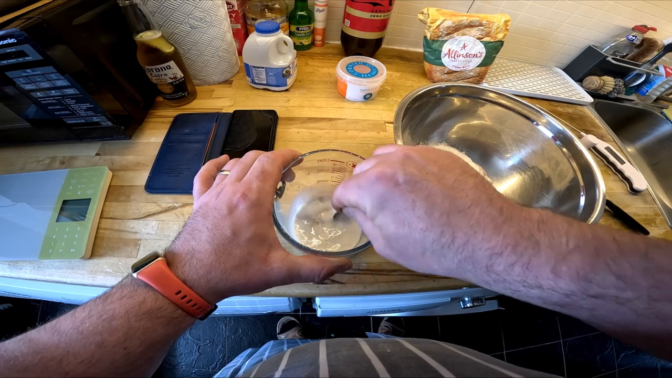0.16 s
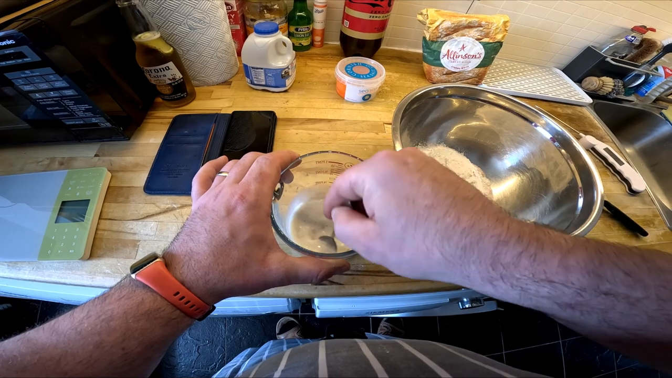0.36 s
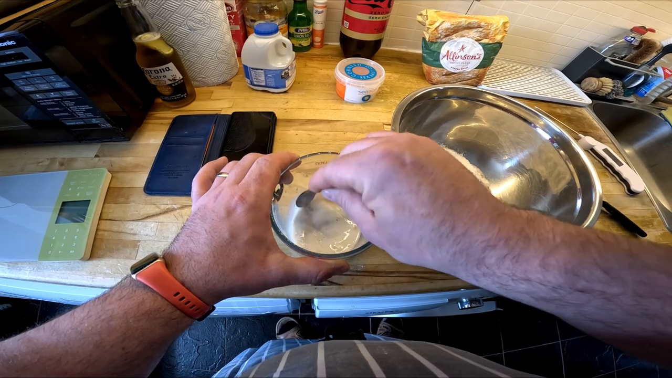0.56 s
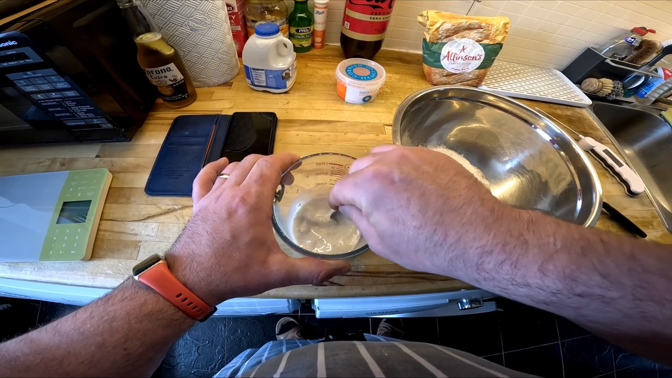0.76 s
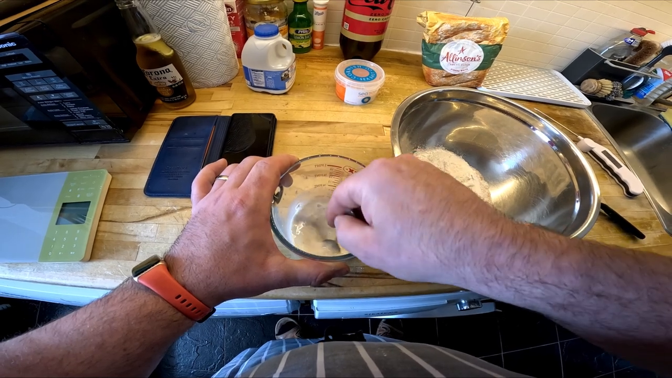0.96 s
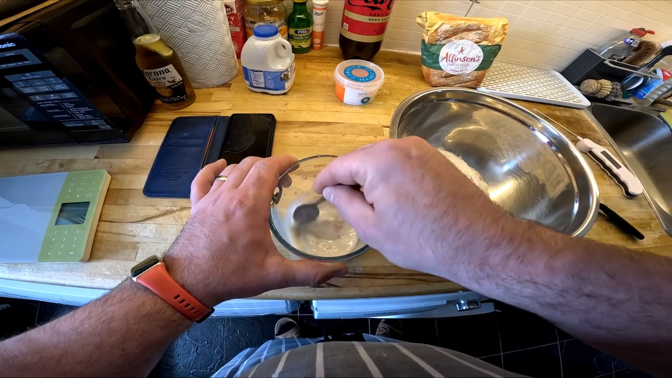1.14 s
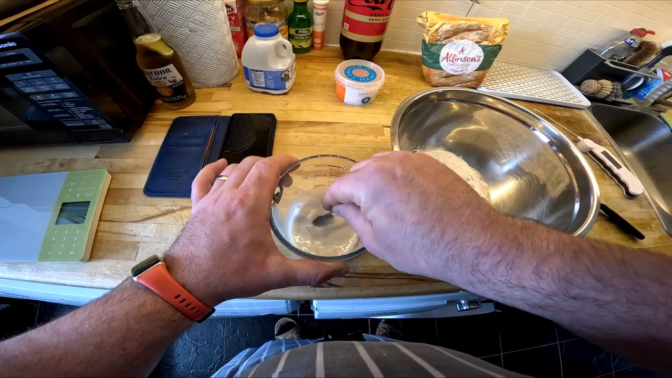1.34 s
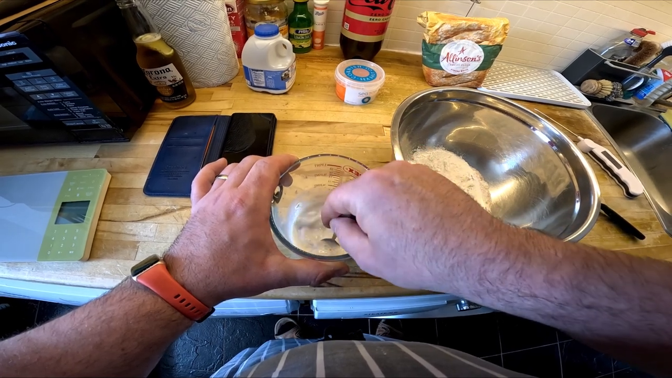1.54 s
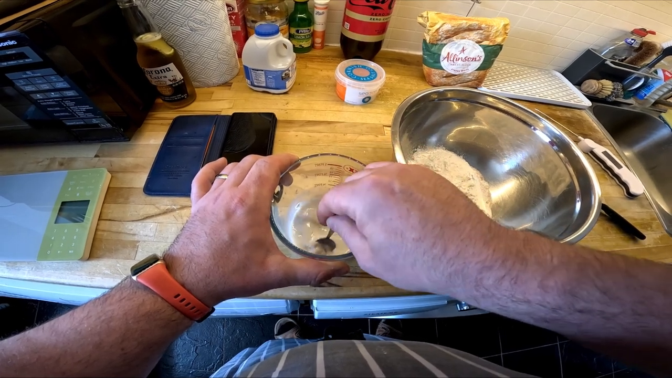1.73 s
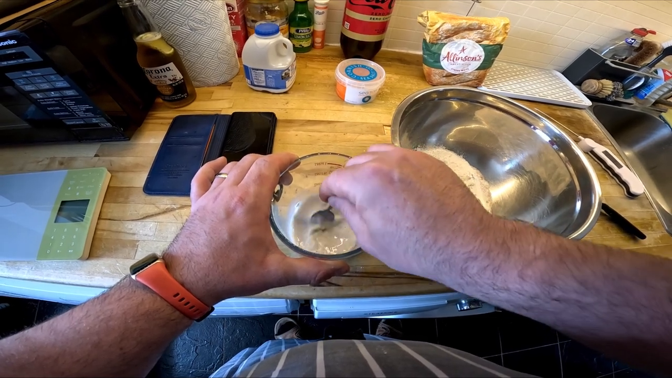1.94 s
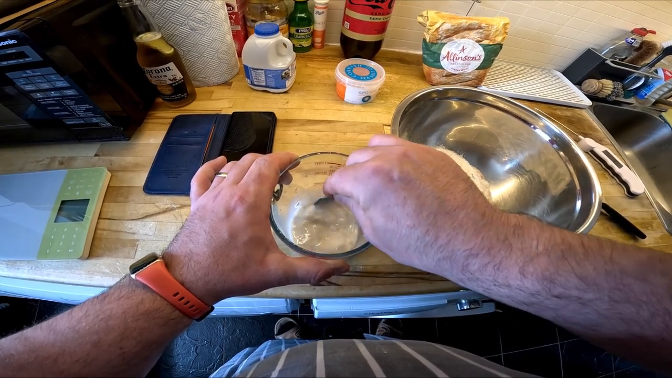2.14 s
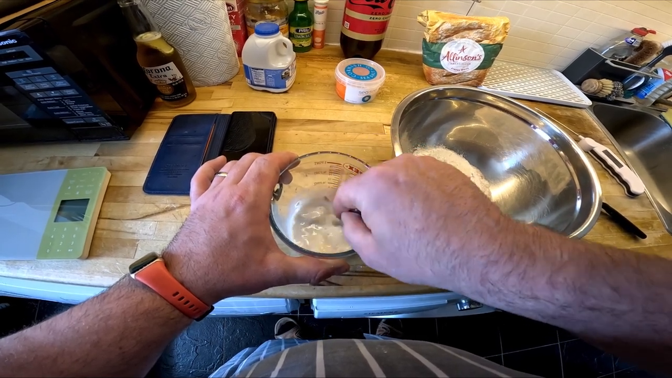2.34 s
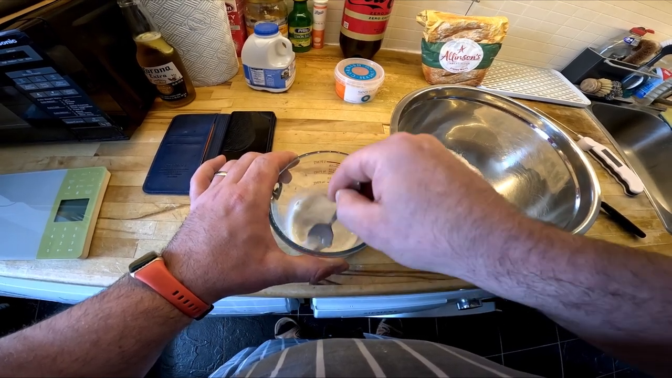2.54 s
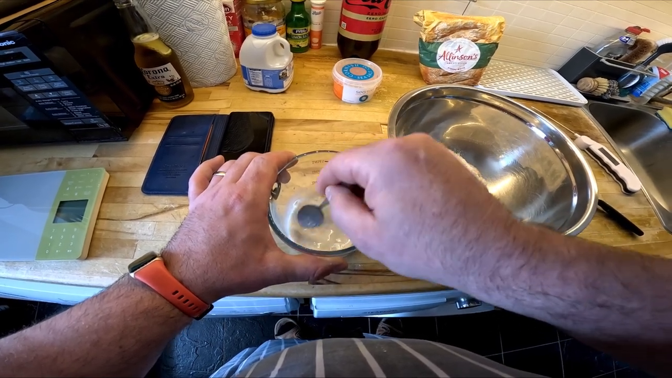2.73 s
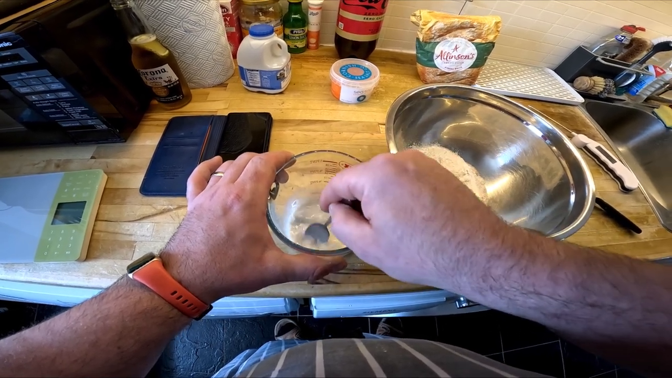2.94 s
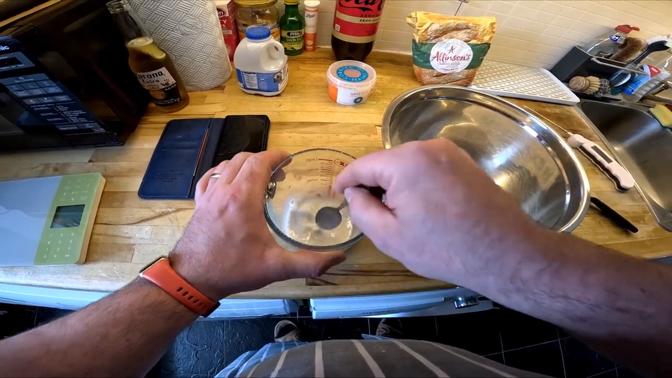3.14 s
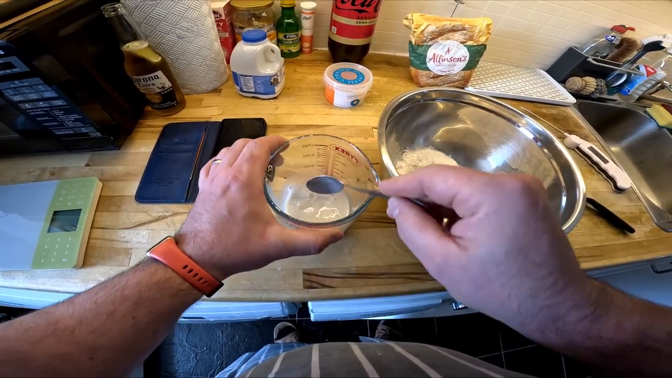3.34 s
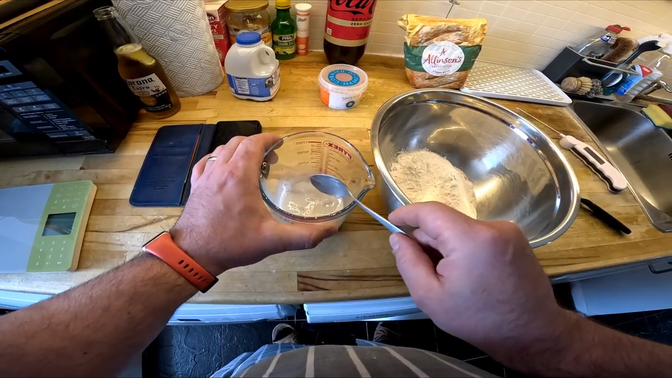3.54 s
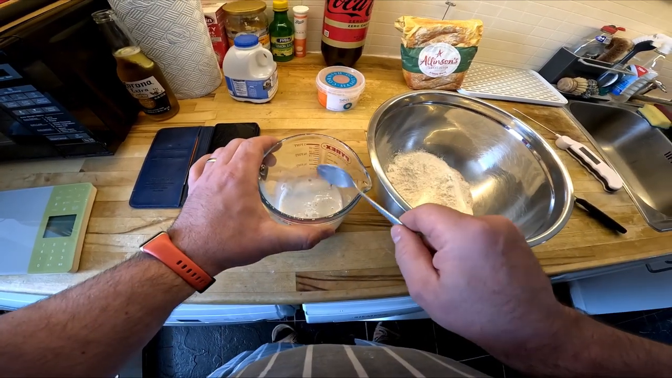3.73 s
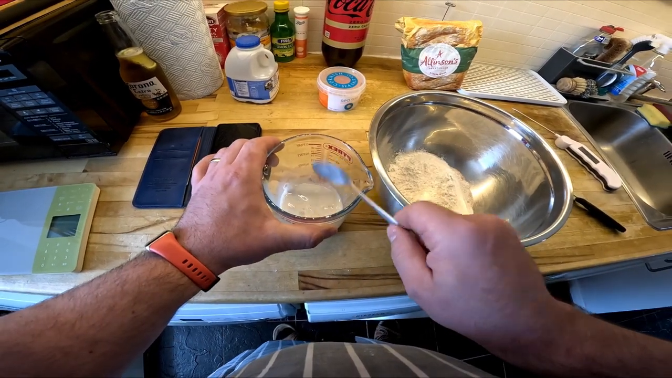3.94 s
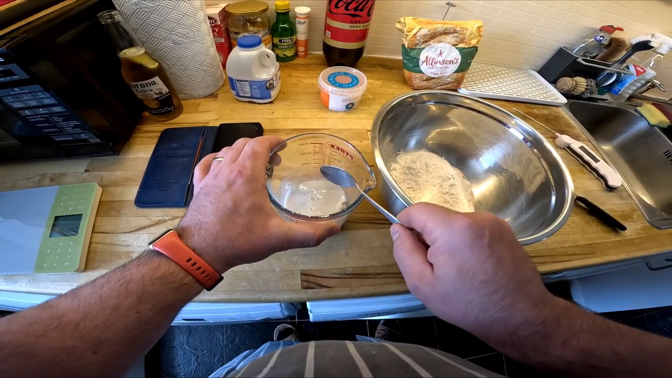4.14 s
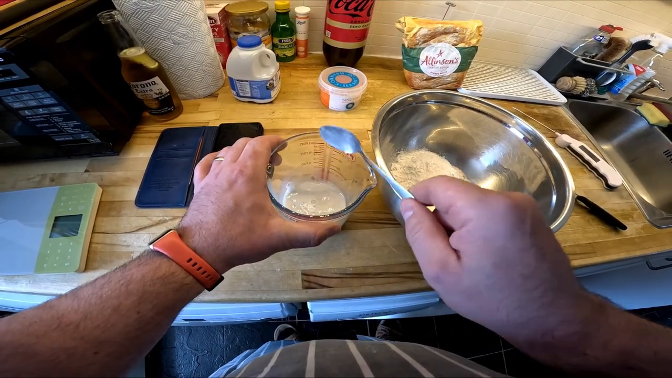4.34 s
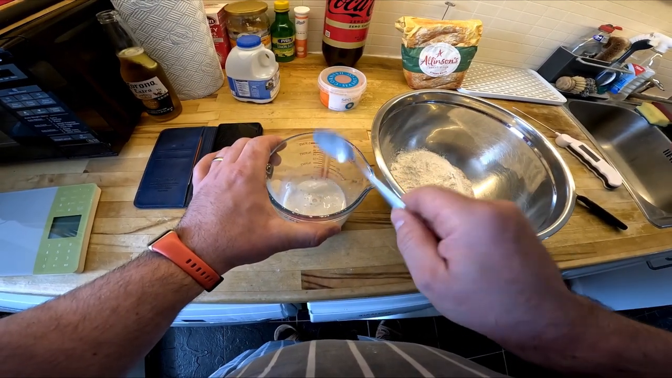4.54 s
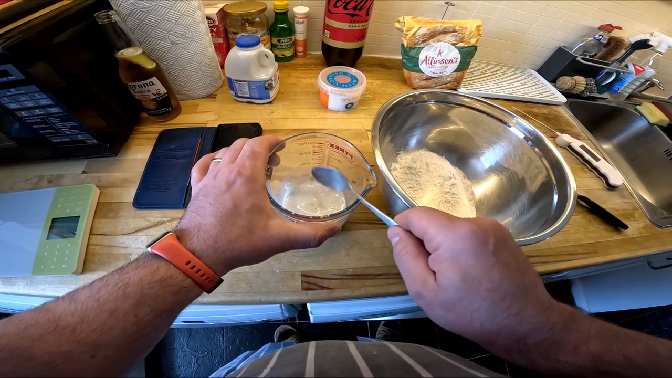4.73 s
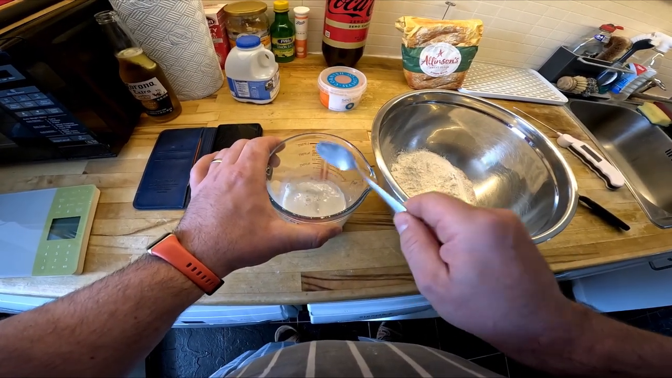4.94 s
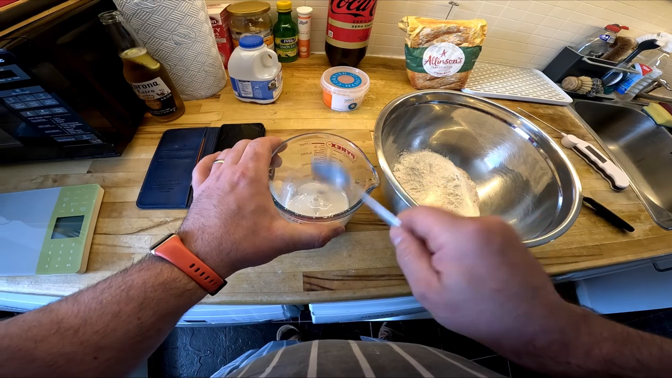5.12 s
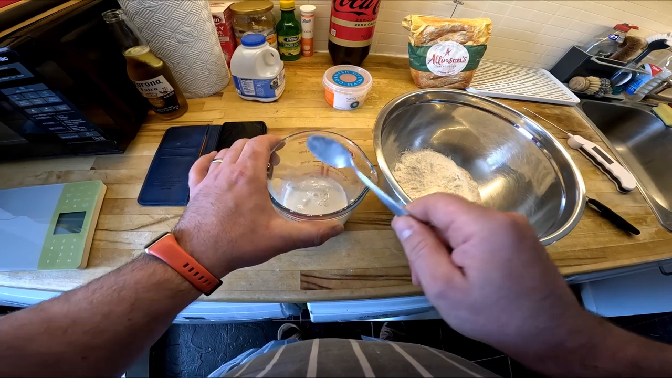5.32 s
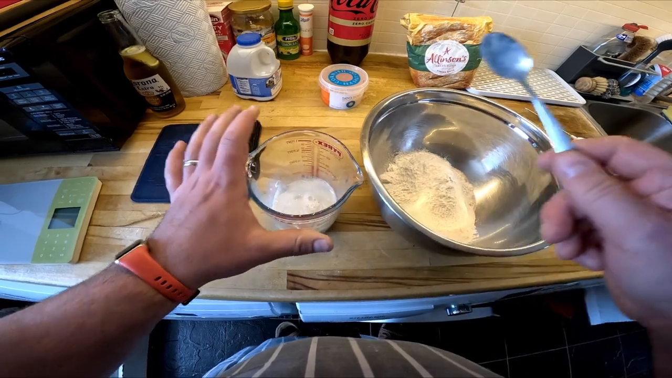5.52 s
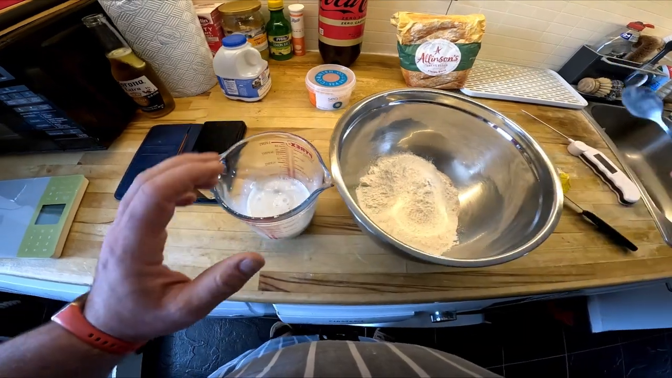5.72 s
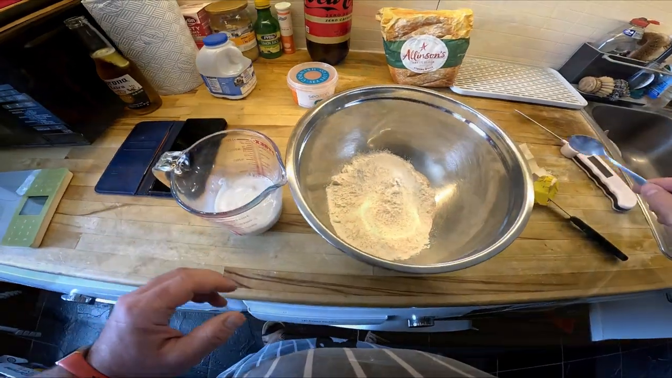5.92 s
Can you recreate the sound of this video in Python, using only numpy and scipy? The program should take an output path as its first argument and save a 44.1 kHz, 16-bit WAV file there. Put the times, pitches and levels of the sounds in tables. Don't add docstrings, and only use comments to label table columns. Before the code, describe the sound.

Wet, damped stirring clinks against glass give way to loud ringing spoon knocks on a jug rim, with the wooden worktop booming underneath.

```python
import sys
import numpy as np
from scipy import signal
from scipy.fft import rfft, irfft
from scipy.io import wavfile
from scipy.ndimage import uniform_filter1d

SR = 44100
rng = np.random.default_rng(int(sys.argv[2]) if len(sys.argv) > 2 else 0)


def to_wav(sig):
    pcm = np.clip(np.atleast_2d(sig), -1, 1) * 32767
    pcm = np.round(pcm).astype(np.int16)
    wavfile.write(sys.argv[1], SR, pcm.T)


def invert_db(level):
    return 10 ** (np.asarray(level, dtype=float) / 20)


N = 267687
T = np.arange(N) / SR

# f/Hz, level/dB
AIR = [(71, -30), (120, -3), (166, 2.5), (437, -23.5), (494, -11), (655, -33), (1110, -13.5), (1870, -42),
       (6420, -28.5), (10000, -41.5)]
# f/Hz, level/dB
RUSTLE = [(150, -29), (250, 1.5), (421, -10), (499, -8), (571, -12), (1650, -14.5), (5100, -31.5),
          (9000, -41)]
# f/Hz, level/dB
RUMBLE = [(10, 2.5), (22, 17.5), (40, -2.5), (100, -1), (140, -19), (250, -48.5)]
# t/s, half length/s, rustle level/dB
MOVES = [(0.436, 0.36, -66.5), (0.958, 0.16, -61), (2.532, 0.17, -75), (3.362, 0.15, -61),
         (3.603, 0.17, -58), (4.196, 0.08, -56), (4.888, 0.13, -59.5), (5.3, 0.13, -77),
         (5.878, 0.13, -72.5), (6.07, 0.11, -63)]
# t/s, throb level/dB
FACING = [(0, -55), (1.5, -53), (1.8, -59), (2.6, -47), (3.1, -56.5), (3.9, -75.5), (4.8, -57.5),
          (5.6, -64), (6.07, -67.5)]
# f/Hz, rms level/dB
HUM = [(150.5, -62.5), (199.5, -67.5), (334, -76.5), (398, -82.5), (495, -76)]
# start t/s, end t/s, start f/Hz, end f/Hz, level/dB
SQUEAKS = [
    (3.28, 3.42, 5150, 5250, -78),
    (5.83, 5.96, 8000, 7900, -84),
    (5.97, 6.06, 7550, 7750, -86),
]
# t/s, half length/s, level/dB, centre f/Hz
SWISHES = [
    (3.36, .12, -69, 1300),
    (5.9, .12, -69, 1600),
    (6.04, .08, -68, 1500),
]

# f/Hz, t60/s, level/dB
KITCHEN = [(128, 0.063, -19.5), (397, 0.26, -6.5), (1146, 0.35, -5.5), (2500, 0.45, -12), (5000, 0.22, -28),
           (7450, 0.43, -14.5), (13000, 1, -29)]
# f/Hz, level/dB
GATE = [(300, -100), (1000, -89), (3000, -88.5), (7000, -91), (12000, -97.5)]
# f/Hz, level/dB
WET_SPRAY = [(500, -23), (1500, -8), (3000, 0.5), (6000, 2.5), (11000, 8), (16000, -5)]
# f/Hz, level/dB
DRY_SPRAY = [(500, -9.5), (1200, -11.5), (2500, -3.5), (5300, 1), (8500, -13), (13500, -9), (16000, -20.5)]
CLINK_SPRAY_DB = [12.5, 12.5, 11.5, 13.5, 14, 12.5, 14, 9.5, 10, 15, 16.5, 8.5, 22.5, 14.5, 14, 1, 5.5, 12]
TAP_SPRAY_DB = [2.1, 3, 3, 3, 3, 3, 1.7, 3]

# t/s, peak level/dB, tilt/dB per octave, jolt level/dB, favoured f/Hz
THUDS = [(0.198, -40.5, 16, -42, 322), (0.839, -34.5, 9, -60, 187.6), (1.456, -35.5, 8.5, -45, 340),
         (1.899, -34.5, -1.5, -47, 188.6), (2.314, -43.5, 17.5, -69, 473), (2.363, -52, 21, -76, 332),
         (2.951, -42, 1, -53.5, 148), (3.492, -27.5, -0.5, -63, 191.5), (3.526, -20.5, -3.5, -51.5, 166),
         (4.088, -23.5, -1.5, -26.5, 100.5), (4.732, -31.5, 0.5, -64, 334), (4.811, -25, -1, -66, 97.6),
         (4.921, -27.5, -2, -81, 99), (5.272, -17.5, -0.5, -25, 247)]
WORKTOP_HZ = [70, 97, 125, 153, 183, 245, 334, 362, 468, 587, 700]
# level/dB, t60/s
WORKTOP = [(-12.5, 0.081), (-5, 0.36), (-14, 0.57), (-7, 0.61), (1.5, 0.29), (-9.5, 0.12), (2, 0.22),
           (-3.5, 0.3), (-6.5, 0.36), (-9.5, 0.17), (-21, 0.25)]
# t/s, f/Hz, level/dB, swell/s, t60/s
ANSWERS = [(.21, 482, -55, 0.016, 0.35), (1.47, 508, -48, 0.015, 0.35), (3.53, 183.5, -31, 0.008, 0.2),
           (3.56, 142, -42, 0.035, 0.24), (3.54, 361, -48, .01, 0.4), (4.092, 180.5, -29, 0.0068, 0.1),
           (4.12, 95, -37.5, .02, 0.38), (4.13, 468, -45, 0.023, 0.42), (4.2, 585, -49.5, 0.01, 0.68),
           (4.24, 152.2, -51.5, 0.032, 0.47), (4.812, 183, -55, .006, .2), (4.925, 345, -38, .008, 0.19),
           (4.93, 462, -45, 0.023, 0.39), (5.03, 587, -55, 0.015, 0.42), (4.092, 804.5, -42, .002, .07),
           (4.728, 760, -38, .002, 0.11), (4.809, 795, -37.5, 0.0016, 0.056),
           (4.921, 788, -28, 0.00094, 0.044), (5.27, 796, -34, .002, .08),
           (5.272, 696.3, -36, 0.0034, 0.13), (5.272, 171.6, -23, 0.0033, 0.12),
           (5.28, 361, -30, 0.014, 0.73), (5.3, 100, -34.5, 0.017, .35), (5.32, 784, -41.5, 0.018, 0.23),
           (5.38, 587, -52.5, 0.025, 0.51), (5.4, 151, -45, 0.081, 1)]
# t/s, f/Hz, level/dB, t60/s
WET_NOTES = [(.2, 4850, -57.5, .2), (0.839, 2800, -42.5, .25), (1.0857, 7050, -57, .25),
             (1.0869, 7320, -56, .25), (1.4545, 6300, -51, .2), (2.542, 7050, -57, .25),
             (2.541, 7260, -53, .3)]
# f/Hz, t60/s
LINGER = [(1688, 0.87), (3350, .5), (3388, .55), (4175, .3), (5825, 0.47), (6720, 0.55), (7127, .4),
          (7330, .25)]
# t/s, then level/dB of each note
LINGER_DB = [(3.525, -55, -43.5, -46, -52.5, -42, -49, -58.5, -46),
             (4.0902, -60.5, -48, -42, -56, -51.5, -44.5, -41.5, -50),
             (4.725, -61.5, -53, -52, -55.5, -51, -49.5, -46.5, -53.5),
             (4.8058, -64.5, -56.5, -56, -53, -54, -53.5, -48, -55),
             (4.918, -62, -61.5, -53.5, -58.5, -54.5, -50.5, -48.5, -52),
             (5.268, -61.5, -55.5, -51.5, -50, -53.5, -50.5, -44.5, -50)]

# t/s, length/s, level/dB, centre f/Hz
SCRAPES = [(0.374, 0.005, -51, 5200), (0.673, 0.0014, -58, 6050), (.712, 0.002, -55.5, 3800),
           (1.624, 0.0045, -44, 2500), (1.665, 0.024, -50.5, 1200), (1.687, 0.0065, -70, 1440),
           (1.99, 0.022, -50.5, 4220), (2.98, .005, -38.5, 2800), (3.239, 0.003, -62, 7500),
           (3.37, 0.067, -79, 5140), (3.74, 0.0058, -51.5, 4590), (3.968, 0.003, -61, 7000),
           (4.051, 0.0033, -60, 6480), (4.27, 0.002, -38, 5500), (5.562, 0.0056, -59.5, 1326),
           (5.68, .006, -60.5, 1300), (5.93, .13, -81, 1600)]
# t/s, peak level/dB, f/Hz, t60/s
CLUNKS = [(0.114, -49.5, 1202, 0.09), (0.188, -32, 783, 0.05), (0.199, -28.5, 820, 0.028),
          (0.289, -46, 1150, 0.021), (0.404, -42.5, 833, 0.11), (0.427, -43, 809, 0.037),
          (0.762, -37.5, 1210, 0.034), (0.838, -16.5, 1027, 0.023), (0.9, -32.5, 780, 0.051),
          (1.018, -34.5, 1270, 0.019), (1.086, -41, 746, 0.059), (1.454, -21.5, 1387, 0.019),
          (1.896, -23, 793, 0.057), (2.311, -39.5, 795, 0.049), (2.36, -34, 786, 0.095),
          (2.517, -27.5, 1358, 0.015), (2.541, -35.5, 806.5, 0.029), (2.953, -22, 1090, 0.021)]
# f/Hz, level/dB, t60/s
JUG_AIR = [(806.7, -8.5, 0.049), (565, -20.5, 0.0071), (1239, -3.5, 0.029)]
# t/s, peak level/dB, middle f/Hz
GRAZES = [(0.138, -54.5, 2145), (0.207, -43, 3065), (.8764, -37, 2770), (0.947, -41, 6030),
          (1.137, -39.5, 2137), (2.72, -58.5, 2257), (3.433, -53, 2110), (3.482, -54.5, 5820),
          (3.796, -65.5, 3400)]
# t/s, peak level/dB, hardness/dB, top band level/dB, t60/s
CLINKS = [(.116, -38, -10, -25, 0.012), (0.1879, -17.5, -18, -34, 0.019), (.2, -14.5, -11.5, -34.5, 0.026),
          (0.291, -34.5, -24, -40, 0.032), (0.401, -26, -16.5, -47, 0.033), (0.4268, -35.5, -30, -52, 0.05),
          (0.762, -25.5, -23, -29.5, 0.011), (.838, -5.5, -11.5, -40, 0.016),
          (0.8999, -18.5, -18, -41.5, 0.042), (1.0183, -27, -27, -48, 0.035),
          (1.0863, -22, -20, -36, 0.023), (1.4558, -9, -2, -51, 0.018), (1.8968, -24.5, -37.5, -57, 0.023),
          (2.3119, -19.5, -13, -42, 0.018), (2.3619, -20, -21.5, -35.5, 0.018),
          (2.514, -21.5, -28, -57, 0.026), (2.54, -21.5, -19, -34, 0.034),
          (2.9519, -5.5, -1.5, -19.5, 0.008)]
# low f/Hz, low level/dB, middle f/Hz, upper f/Hz, upper level/dB
SPOTS = [(2330.0, 2, 4130.0, 6200.0, 5), (2280.0, -2, 3710.0, 4590.0, -4), (2300.0, -8, 3870.0, 4790.0, 5),
         (1710.0, 2, 2950.0, 4750.0, -6), (1800.0, 1, 3630.0, 4490.0, 3), (2370.0, 4, 3350.0, 5780.0, -4),
         (2490.0, 2, 4160.0, 5650.0, 1), (2760.0, 5, 3070.0, 4680.0, 2), (2300.0, -9, 3750.0, 4760.0, -7),
         (1750.0, -2, 3570.0, 4520.0, -9), (2380.0, -2, 3240.0, 7300.0, -4), (2620.0, 3, 3190.0, 6260.0, 1),
         (1880.0, 5, 3340.0, 4770.0, -16), (2550.0, -4, 3830.0, 5660.0, -5),
         (2590.0, -6, 3890.0, 4400.0, -9), (2680.0, 0, 3340.0, 4380.0, -2), (2200.0, 2, 3080.0, 7110.0, -4),
         (2300.0, 8, 3090.0, 5290.0, 2)]
CLINK_PAN_DB = [.3, 0.88, 1.2, .3, .3, .3, .3, -0.082, .3, .3, .3, -.3, -0.45, .3, 0.11, 0.18, -0.31,
                -1.955]
CLINK_CRACK_DB = [-22, -12, -7, -11, -12, -12, -13, -12, -18, -9.5, -7.5, -7, -7.5, -15.5, -13.5, -5, -8.5,
                  -6.5]
# f/Hz, level/dB
WET_GLASS = [(2200, -7), (2610, -9), (3240, -0.5), (3780, -1), (4200, -4), (4800, 1), (5500, 7.5),
             (6060, 1.5), (6500, 0), (7170, 14.5), (8200, 13.5), (9100, 2.5), (10100, 9.5), (11200, 15.5),
             (13500, 7.5)]
# f/Hz, level/dB
WET_CRACK = [(700, -22), (1600, -9), (3000, -2), (6000, 17.5), (8500, 18), (11000, 12), (14000, 8),
             (16000, -38)]
# f/Hz, level/dB, t60/s
SPOON = (7200, 3, .06)

# t/s, peak level/dB, hardness/dB, body level/dB, favoured f/Hz
TAPS = [
    (3.524, 1, -6.5, -21, 6250),
    (4.0902, 0, 6, -13.5, 6760),
    (4.1089, -20, -3, -40, 7170),
    (4.727, -5, -1, -22, 6650),
    (4.8074, -3.5, -1, -22, 6830),
    (4.919, -3, -3, -24, 6765),
    (5.2681, 1.5, -1, -16.5, 6950),
    (5.2931, -16.5, -6.5, -24.5, 6080),
]
TAP_MIDDLE_DB = [-3, -0.5, -9, -2, -1, -0.5, -4, -5]
TAP_PAN_DB = [-5.5, 3, -1, 3.5, 5, 5, 3, 3]
RIM_HZ = [790, 1190, 1686, 2320, 3012, 3345, 3375, 3435, 3680, 4172, 4555, 4750, 5200, 5822, 6000, 6400,
          6680, 6830, 7080, 7130, 7345, 7800, 8960, 9640, 10500, 11150, 12300, 12850, 13700]
# level/dB, t60/s
RIM = [(11.5, 0.01), (-3, 0.01), (-14, 0.15), (-16.5, 0.036), (-18.5, 0.1), (-6, 0.071), (-21, 0.23),
       (-4.5, 0.041), (0, 0.0043), (-4, 0.022), (-7, .02), (-9.5, 0.015), (-13.5, 0.021), (-26.5, 0.51),
       (-2.5, 0.03), (-4, 0.018), (2.5, 0.014), (-17, 0.023), (4, 0.015), (-29.5, 0.48), (1, 0.028),
       (-8.5, 0.053), (-7, 0.0091), (3.5, 0.01), (8.5, 0.0086), (-4, 0.025), (-10, .012), (1.5, 0.011),
       (-6, 0.0081)]
# f/Hz, level/dB
RIM_CRACK = [(300, 2.5), (900, 4.5), (2000, -24.5), (3400, -8), (5200, -29.5), (6700, 15), (8500, -23.5),
             (10500, -6.5), (14000, -5), (16000, -40.5)]
BAND_HZ = (1000, 3000, 6000, 11000)
PAN_SHARE = (0, .2, 1, 0)

# f/Hz, level/dB
MICROPHONE = [(14300, 0.5), (15400, -18.5), (16400, -56)]
LEAKS_S = [.1877, .838, 1.4557, 2.3118, 2.9515, 3.524, 4.0906, 4.727, 5.2677]
LEAK_DB = (-25.5, -37, -51)
LEAK_S = 512 / 48000


def unit(x):
    return x / np.sqrt(np.mean(x ** 2))


def colour(x, points):
    hz, db = np.transpose(points)
    log_f = np.log(np.fft.rfftfreq(x.shape[-1], 1 / SR) + 1)
    return irfft(rfft(x) * invert_db(np.interp(log_f, np.log(hz), db)), x.shape[-1])


def walk(rate):
    hold = int(SR / rate)
    steps = np.repeat(rng.standard_normal(N // hold + 1), hold)
    return unit(uniform_filter1d(uniform_filter1d(steps, hold), hold)[:N])


def pair(alike, size=N):
    mid, side = rng.standard_normal((2, size))
    alike = np.clip(alike, 0, 1)
    return np.sqrt(1 + alike) * mid + np.sqrt(1 - alike) * side * np.array([[1], [-1]])


def add(out, s, x):
    i = int(s * SR)
    out[:, i:i + x.shape[-1]] += x[..., :N - i]


def hump(s, length):
    return np.exp(-((T - s) / length) ** 2)


def ring(modes, shape_db, chance, scatter_db, detune, side_db):
    hz, db, t60 = np.transpose(modes)[:, :, None]
    t = T[:SR // 2]
    size, tune, phase, side = chance.reshape(4, -1, 1)
    fade = invert_db(db + scatter_db * size - 60 * t / t60)
    rank = np.argsort(np.argsort(hz, axis=0), axis=0)
    turn = np.pi * rank + 0.45 * phase
    waves = fade * np.sin(2 * np.pi * hz * (1 + detune * tune) * t + turn)
    y = invert_db(shape_db + side_db * np.array([[1], [-1]]) * side.T) @ waves
    return y / np.abs(y).max()


def crack(points, shape, t60):
    t = T[:SR // 2]
    ears = [colour(colour(noise, points), ear) for noise, ear in zip(pair(0.9, len(t)), shape)]
    return unit(np.array(ears)) * np.exp(-np.log(1000) * t / t60)


def blow(x, db, rise_s):
    x = x * (1 - np.exp(-(T[:x.shape[-1]] / rise_s) ** 2))
    return invert_db(db) * x / np.abs(x.mean(axis=0)).max()


def contact(modes, grain, bands_db, pan_db, tilt_db, crack_db, crack_t60, **spread):
    ears_db = np.array(bands_db) + np.outer([pan_db, -pan_db], PAN_SHARE) / 2
    log_hz = np.log(np.array(modes)[:, 0])
    shape_db = np.array([np.interp(log_hz, np.log(BAND_HZ), ear) for ear in ears_db])
    tone = ring(modes, shape_db + tilt_db, rng.standard_normal(4 * len(modes)), **spread)
    return tone + invert_db(crack_db) * crack(grain, [list(zip(BAND_HZ, ear)) for ear in ears_db], crack_t60)


def room_air():
    level_db = -68 + walk(0.77) + 0.73 * walk(3.2)
    return invert_db(level_db) * unit(colour(pair(0.73), AIR))


def movement():
    moving = sum(invert_db(db) * hump(s, length) for s, length, db in MOVES)
    facing = invert_db(np.interp(T, *np.transpose(FACING)))
    still_db = -70
    rustle = (invert_db(still_db) + moving) * invert_db(-3.5 + 2 * walk(17)) * unit(colour(pair(0.16), RUSTLE))
    shake = invert_db(-81.5) + facing * invert_db(-15) + moving * invert_db(-6)
    rumble = shake * invert_db(9.5 + 3.5 * walk(3.1)) * unit(colour(pair(1.0), RUMBLE))
    return rustle + rumble


def fridge():
    mains_hz, motor_hz, mains_db = 49.8, 44.78, -8.5
    peak_s, lead = 2.69, 0.51
    facing = invert_db(np.interp(T, *np.transpose(FACING)))
    turn = 2 * np.pi * (T - peak_s) + np.array([[.5], [-.5]]) * lead / motor_hz
    beat = invert_db(mains_db) * np.cos(mains_hz * turn) + np.cos(motor_hz * turn)
    throb = facing * invert_db([[1.5], [4.0]]) * beat
    hum = 0
    for hz, db in HUM:
        hum = hum + invert_db(db - 2.5 + 3.2 * walk(32)) * np.sin(2 * np.pi * hz * T + 1.5 * walk(6.6))
    return throb + hum


def squeaks():
    out = 0
    for t0, t1, hz0, hz1, db in SQUEAKS:
        share = np.clip((T - t0) / (t1 - t0), 0, 1)
        phase = 2 * np.pi * np.cumsum(hz0 + (hz1 - hz0) * share) / SR
        out = out + invert_db(db) * np.sin(np.pi * share) * np.sin(phase)
    return out


def swishes():
    out, noise = 0, pair(0.66) * invert_db(1.5 * walk(6.6))
    for s, length, db, hz in SWISHES:
        band = unit(colour(noise, [(hz / 4, -18), (hz, 0), (hz * 1.6, -8), (hz * 5, -32)]))
        out = out + invert_db(db) * band * hump(s, length)
    return out


def kitchen(x):
    t = T[:SR]
    tail = 0
    for hz, t60, db in KITCHEN:
        noise = pair(np.clip(.97 - hz / 14000, .3, .97), size=SR)
        band = colour(noise, [(hz / 3, -40), (hz / 1.9, -4), (hz, 0), (hz * 2.045, -4), (hz * 3, -40)])
        tail = tail + invert_db(db - 60 * t / t60) * band / np.sqrt(t60 * SR / 14)
    tail = tail * (1 - np.exp(-t / 0.00089)) * (1 + 1.6 * np.exp(-t / 0.0093))
    return signal.fftconvolve(x.mean(axis=0)[None], tail, axes=1)[:, :N]


def hush(x):
    f, _, z = signal.stft(x, SR, nperseg=1024)
    power = uniform_filter1d(np.mean(np.abs(z) ** 2, axis=0), size=21, axis=0)
    floor = invert_db(2 * np.interp(f, *np.transpose(GATE)))[:, None]
    return signal.istft(z * power / (power + floor), SR, nperseg=1024)[1][:, :N]


def spray():
    out, click = np.zeros((2, N)), signal.unit_impulse(1024, 64)
    for (s, db, bright_db, air_db, _), spray_db in zip(CLINKS, CLINK_SPRAY_DB):
        hard = colour(click, list(zip(BAND_HZ, [0, 0, bright_db, air_db])))
        add(out, s, invert_db(db + spray_db) * colour(hard, WET_SPRAY)[None])
    for (s, db, *_), spray_db in zip(TAPS, TAP_SPRAY_DB):
        add(out, s, invert_db(db + spray_db) * colour(click, DRY_SPRAY)[None])
    return out


def worktop():
    out = np.zeros((2, N))
    modes = np.column_stack([WORKTOP_HZ, WORKTOP])
    hz = modes[:, 0]
    chances = rng.standard_normal((len(THUDS), 4 * len(modes)))
    t = T[:SR // 4]
    jolt = t / 0.014 * np.exp(-t / 0.0063) * np.cos(2 * np.pi * 25 * t)
    grain = [(40, -16.5), (100, 7.5), (350, -1.5), (900, -13.0), (2500, -47.5)]
    for (s, db, tilt_db, jolt_db, note_hz), chance in zip(THUDS, chances):
        favour_db = 7 * np.exp(-(np.log(hz / note_hz) * 6) ** 2)
        shape_db = favour_db + tilt_db * np.log2(hz / 180)
        tone = ring(modes, shape_db, chance, scatter_db=-1.0, detune=1 / 200, side_db=0.5)
        tilt = [(90, -tilt_db), (720, 2 * tilt_db)]
        wood = crack(grain, [tilt, tilt], t60=0.36)
        add(out, s, blow(tone + invert_db(-7.0) * wood, db, rise_s=0.0039))
        add(out, s, invert_db(jolt_db + 16.5) * jolt[None])
    return out


def afterring():
    out = np.zeros((2, N))
    t = T[:SR]
    rows = [(*answer, .22) for answer in ANSWERS]
    rows += [(s, hz, db, .004, t60, 1) for s, hz, db, t60 in WET_NOTES]
    for s, *levels in LINGER_DB:
        rows += [(s, hz, db, .004, t60, 1) for (hz, t60), db in zip(LINGER, levels)]
    for s, hz, db, swell_s, t60, hold_s in rows:
        shape = (1 - np.exp(-(t / swell_s) ** 2)) * np.exp(-(t / hold_s) ** 3)
        note = invert_db(db - 60 * t / t60) * shape * np.sin(2 * np.pi * hz * t)
        add(out, s, note[None])
    return out


def scrapes():
    out = 0
    grit = rng.standard_normal(N) * invert_db(6.3 * rng.exponential(size=N))
    for s, length, db, hz in SCRAPES:
        band = unit(colour(grit, [(hz / 8, -24), (hz, 0), (hz * 2, -20), (hz * 4, -50)]))
        out = out + invert_db(db + 1.5) * band * hump(s, length)
    return out


def clunks():
    out = np.zeros((2, N))
    grain = [(300, -21.5), (600, -9.5), (1000, -3.0), (1600, -2.5), (3000, -46.5)]
    for s, db, hz, t60 in CLUNKS:
        modes = list(JUG_AIR) + [(hz, 6, t60)]
        chance = rng.standard_normal(4 * len(modes))
        tone = ring(modes, 0, chance, scatter_db=0.0, detune=1 / 300, side_db=3.0)
        slap = crack(grain, [[(hz, 0)]] * 2, t60)
        add(out, s, blow(tone + invert_db(-6.0) * slap, db, rise_s=0.0015))
    return out


def wet_hit(db, bright_db, air_db, t60, spot, pan_db, crack_db):
    low_hz, low_db, middle_hz, upper_hz, upper_db = spot
    bands_db = [0, 0, bright_db, air_db]
    wall = np.array([(hz, wall_db, 0.86 * t60) for hz, wall_db in WET_GLASS])
    notes_hz = np.array([low_hz, middle_hz, upper_hz])
    lift_db = 5 - np.interp(np.log(notes_hz), np.log(BAND_HZ), bands_db)
    notes = np.column_stack([notes_hz, lift_db + [low_db, 0, upper_db], np.full(3, t60)])
    pairs = [notes * [1 + k * 0.035, 1, .75] for k in (-1, 1)]
    spoon_hz, spoon_db, spoon_t60 = SPOON
    sing_db = spoon_db - np.minimum((np.log(upper_hz / spoon_hz) * 12) ** 2 * 2, 40)
    modes = np.vstack([wall, *pairs, (spoon_hz, sing_db, spoon_t60)])
    x = contact(modes, WET_CRACK, bands_db, pan_db=1.84, tilt_db=0, crack_db=crack_db, crack_t60=t60,
                scatter_db=0.5, detune=1 / 200, side_db=1.5)
    return blow(x * invert_db([[pan_db / 2], [-pan_db / 2]]), db, rise_s=0.00028)


def grazes():
    out = np.zeros((2, N))
    for s, db, hz in GRAZES:
        add(out, s, wet_hit(db, -18.5, -47.5, t60=0.011, spot=(hz, 0, hz, hz, -20), pan_db=0, crack_db=-12.5))
    return out


def clinks():
    out = np.zeros((2, N))
    for (s, *strike), spot, pan_db, crack_db in zip(CLINKS, SPOTS, CLINK_PAN_DB, CLINK_CRACK_DB):
        add(out, s, wet_hit(*strike, spot, pan_db, crack_db))
    return out


def taps():
    out = np.zeros((2, N))
    modes = np.column_stack([RIM_HZ, RIM])
    for (s, db, bright_db, low_db, note_hz), middle_db, pan_db in zip(TAPS, TAP_MIDDLE_DB, TAP_PAN_DB):
        bands_db = [low_db, middle_db, bright_db, bright_db - 15]
        favour_db = 9.5 * np.exp(-(np.log(modes[:, 0] / note_hz) * 20) ** 2)
        x = contact(modes, RIM_CRACK, bands_db, pan_db=pan_db, tilt_db=favour_db, crack_db=-5.5,
                    crack_t60=0.0031, scatter_db=3.5, detune=1 / 1000, side_db=1.8)
        grip_db, grip_s = 6.5, 0.0069
        x = x * invert_db(grip_db * np.exp(-(T[:x.shape[-1]] / grip_s) ** 2))
        add(out, s, blow(x, db, rise_s=0.00078))
    return out


def scene():
    wet = clinks() + grazes() + clunks()
    rim = taps()
    knocks = worktop() + scrapes()
    echo = kitchen(invert_db(-6) * wet + invert_db(-2) * rim + knocks + spray())
    background = room_air() + movement() + fridge() + squeaks() + swishes()
    return wet + rim + knocks + hush(echo) + afterring() + background


def roll_off(x):
    return signal.sosfilt(signal.butter(12, 15800, fs=SR, output="sos"), x)


def record(dry):
    f = np.fft.rfftfreq(N, 1 / SR)
    ceiling = .9
    rounded = dry / (1 + (dry / ceiling) ** 6) ** (1 / 6)
    heard = colour(rounded, MICROPHONE)
    leak = sum(invert_db(db) * np.exp(2j * np.pi * f * LEAK_S * (k + 1)) for k, db in enumerate(LEAK_DB))
    ahead = sum((T > s - 4 * LEAK_S) & (T < s) for s in LEAKS_S)
    early = ahead * irfft(rfft(heard) * leak, N)
    lag = np.exp(-2j * np.pi * f * np.array([[.7], [0]]) / SR)
    mix = irfft(rfft(heard - early) * lag, N)
    return roll_off(mix)


dry = scene()
out = record(dry)
to_wav(out)
```